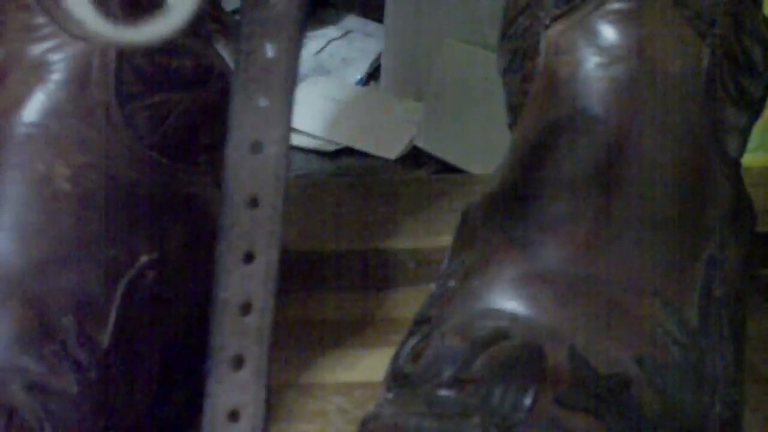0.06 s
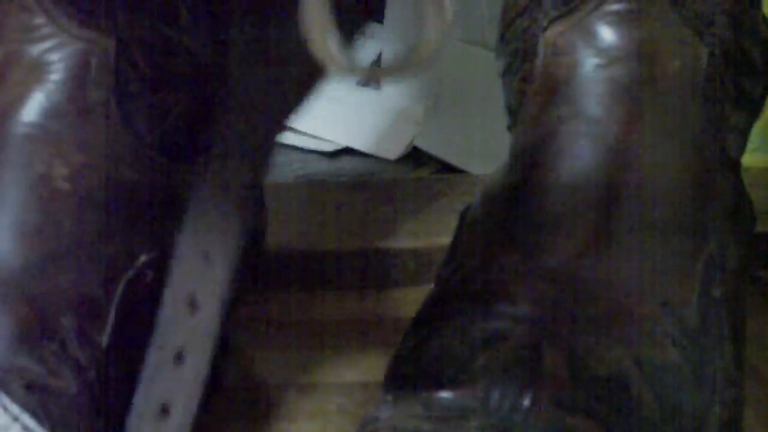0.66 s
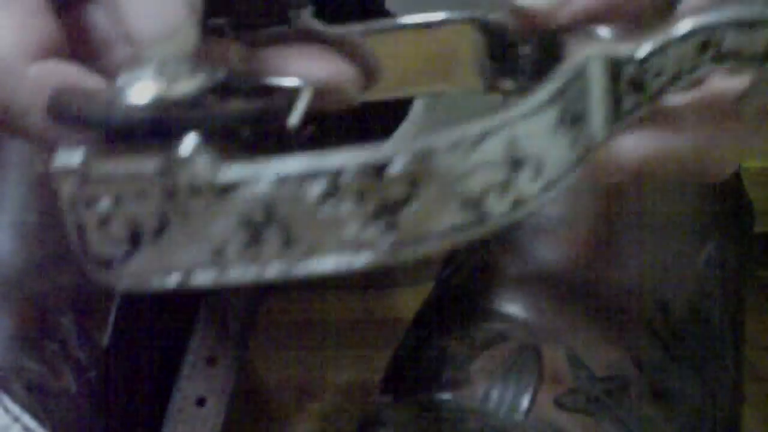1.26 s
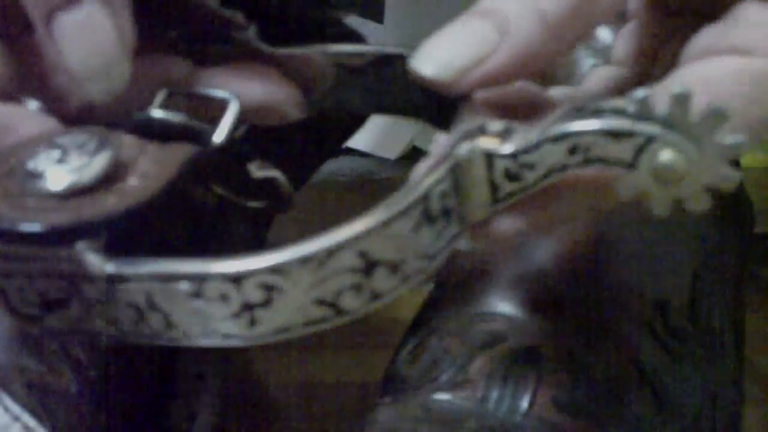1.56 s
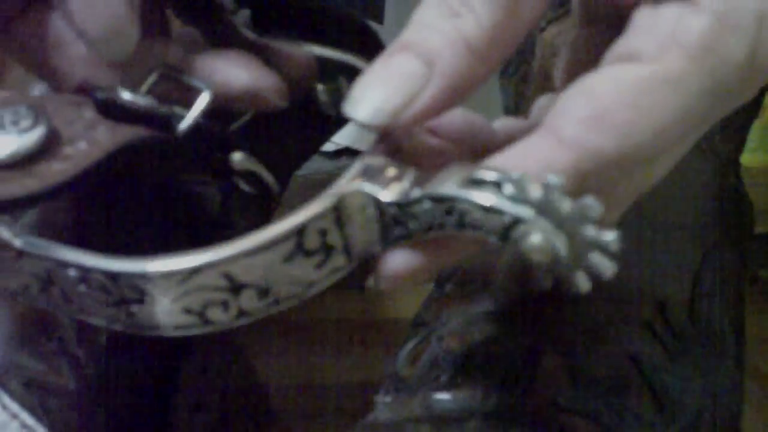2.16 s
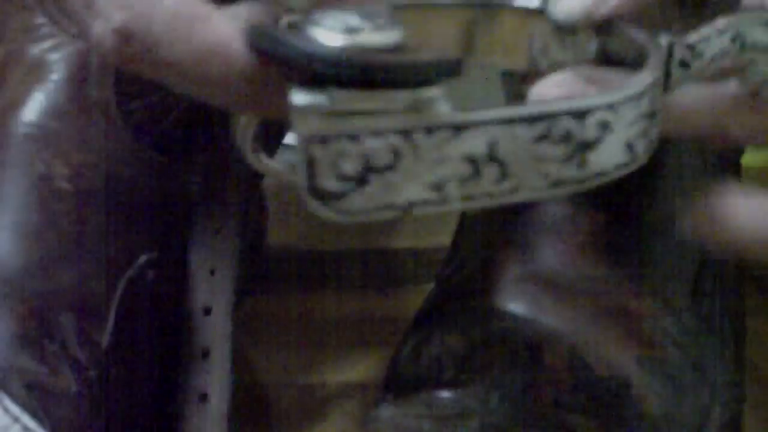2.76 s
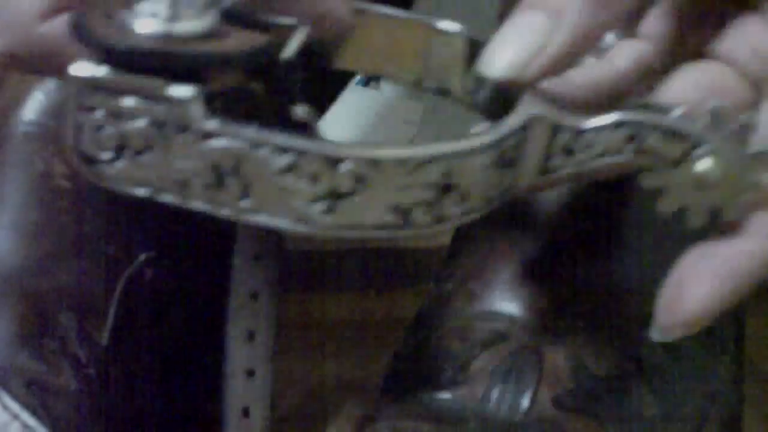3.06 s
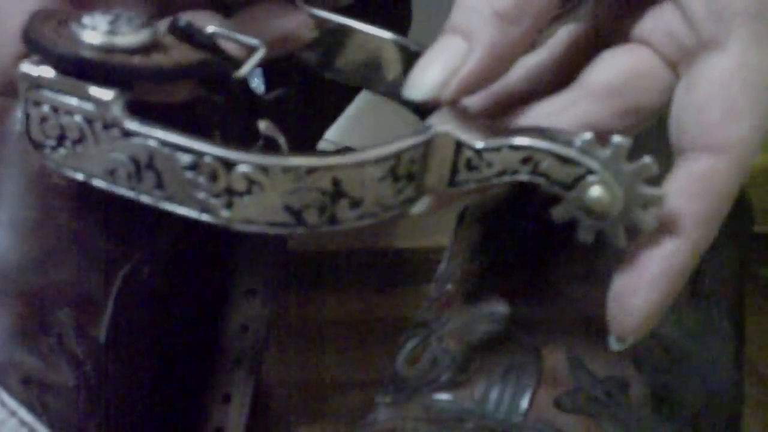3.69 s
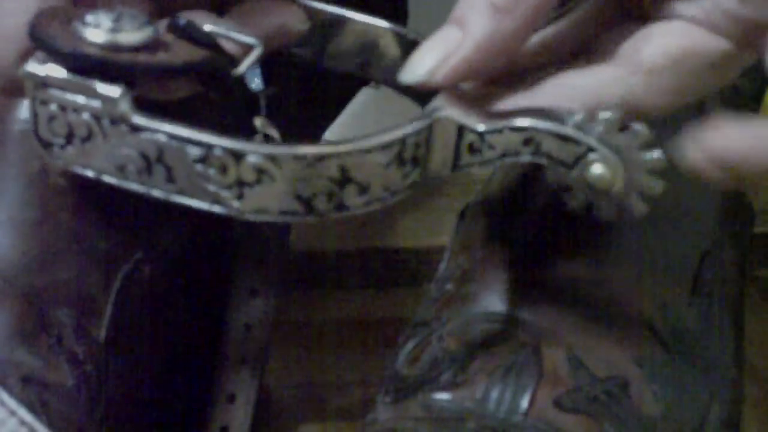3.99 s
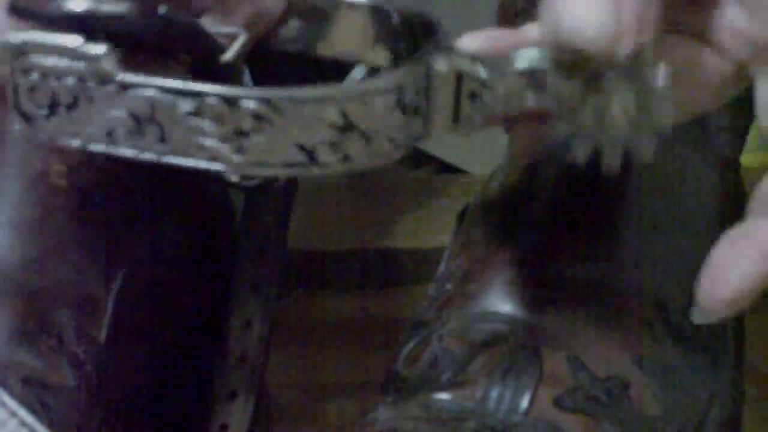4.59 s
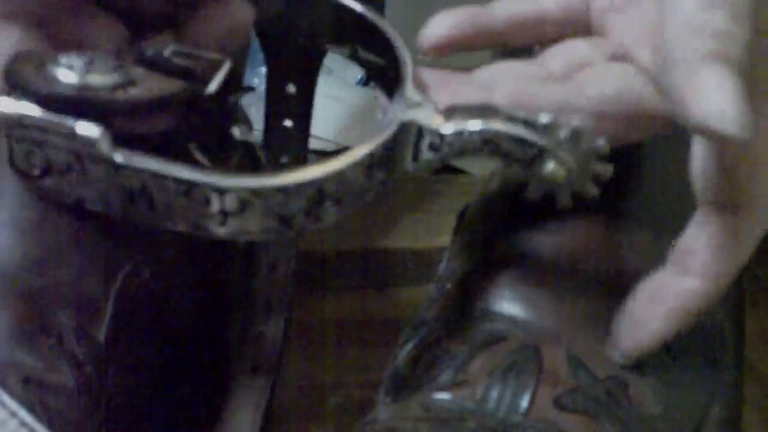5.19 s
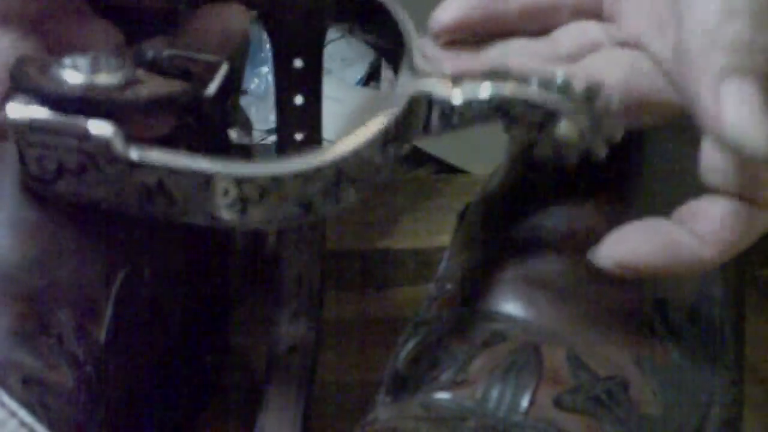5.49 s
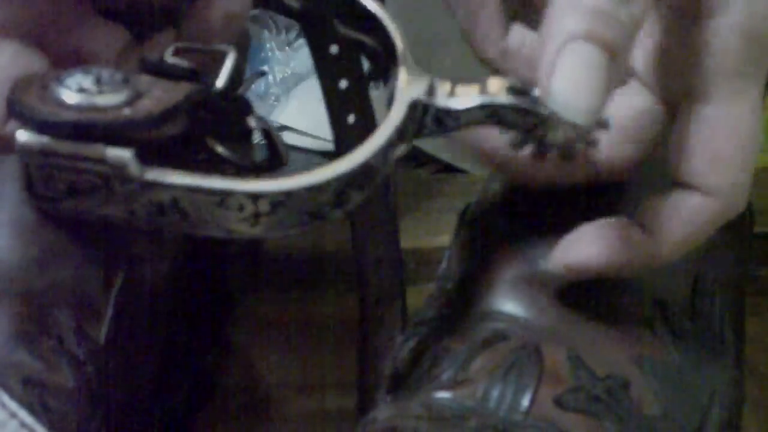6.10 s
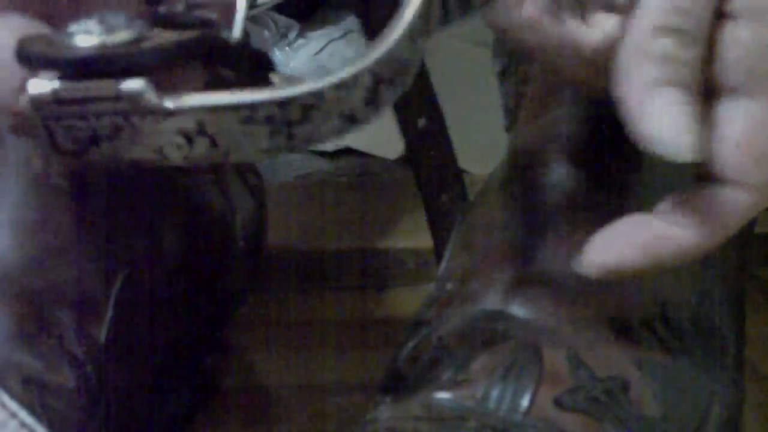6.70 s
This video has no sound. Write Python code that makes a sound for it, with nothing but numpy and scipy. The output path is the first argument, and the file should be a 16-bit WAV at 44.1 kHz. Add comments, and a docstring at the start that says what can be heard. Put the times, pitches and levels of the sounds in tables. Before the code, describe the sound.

Two clattering knocks, then light, high metal clinks and brief rattles from a spur handled close up, with soft pops and rumble underneath.

```python
"""A steel spur turns in the fingers, close to a small microphone in a quiet room.
Its toothed rowel clinks on the pin, scrapes and rattles as it spins, and sets the shank and heel
band ringing; now and then a loose fitting pings. It is picked up at the start with two clattering
knocks on wood. Underneath lie a dull, sputtering rumble with soft pops, one deep thud and faint hiss."""
import sys
import numpy as np
from scipy import signal
from scipy.fft import rfft, irfft, next_fast_len
from scipy.io import wavfile

SR = 44100
rng = np.random.default_rng(int(sys.argv[2]) if len(sys.argv) > 2 else 0)


def master_out(mix):
    """Clip the mix to full scale and print it as 16-bit PCM to the path in sys.argv[1]."""
    frames = np.transpose(np.atleast_2d(mix))
    ceiling = np.clip(frames, -1, 1)
    pcm = np.round(ceiling * 32767).astype(np.int16)
    wavfile.write(sys.argv[1], SR, pcm)


N = 302085

# The room's decay. Each row: frequency in Hz, t60 in seconds.
ROOM_DECAY = [(200, 0.27), (2000, 0.22), (10000, 0.18)]
# The rumble's colour. Each row: frequency in Hz, relative density in dB.
RUMBLE_SPECTRUM = [(15, 1), (30, 0.5), (100, -2), (250, -6), (500, -13.5), (1000, -20.5), (2000, -31.5),
                   (4000, -49), (7000, -57), (11000, -64.5)]
# The rise and fall of the sputtering. Each row: time in seconds, level in dB.
SPUTTER_LEVELS = [(0, -43.5), (.85, -45), (1.15, -40.5), (1.35, -44.5), (1.7, -41), (2.1, -44.5),
                  (3.1, -42.5), (3.8, -45), (6.85, -47)]
# Soft pops that stand out. Each row: time in seconds, level in dB, width in seconds.
LOUD_POPS = [(.202, -26.5, 0.00074), (1.137, -19.5, 0.0024), (1.527, -23.5, 0.0007), (1.654, -28, 0.00065),
             (2.343, -24, .0006), (2.402, -17.5, 0.001), (2.948, -20, 0.0007), (2.959, -19.5, .0009),
             (3.128, -19.5, 0.0011), (3.133, -19, 0.0022), (3.226, -23, 0.0026), (4.543, -27, 0.00054),
             (4.568, -23, .0005), (4.652, -24, 0.00076), (5.987, -21.5, 0.00087)]
# The spur bumps on wood. Each row: start in seconds, level in dB, crack in relative dB, gain of the push.
WOOD_BUMPS = [(.237, -7, -1.5, 0.73), (.246, -21, -1, 0), (0.27, -21.5, -0.5, 0.56), (0.287, -18, 0, 0.16),
              (.291, -16, -2, 0.59), (0.438, -25.5, -14.5, 1), (0.4954, -12.5, -4.5, 0.9),
              (0.5096, -20, 0, 0.99)]
# The wood's modes. Each row: frequency in Hz, relative level in dB, t60 in seconds.
WOOD_MODES = [(89.5, -7.5, 0.19), (122, -1, .15), (160, 3, .15), (205, -4.5, 0.18), (244, 1, 0.3),
              (275, -7, .15), (345, -12.5, .15), (400, -6, 0.21), (421, -6, .2), (689, -8, .2),
              (803, -2.5, 0.088), (892, -3.5, 0.14), (943, -11, 0.16), (1100, -11.5, 0.15),
              (1166, -11, 0.2), (1385, -8.5, 0.163), (1680, -3, 0.081), (1850, -16.5, 0.12),
              (2280, -13, 0.12), (2563, -15.5, .14)]
# The crack of a bump. Each row: frequency in Hz, relative density in dB.
CRACK_SPECTRUM = [(100, -6), (450, 1), (900, 6), (2000, 0.5), (3900, -7), (5200, -13.5), (7000, -14),
                  (11000, -22.5)]
# A loose fitting taps the heel band. Each row: start in seconds, level in dB.
FITTING_PINGS = [(.851, -39), (2.664, -52.5), (3.058, -49), (3.077, -47), (3.378, -53), (4.144, -50.5),
                 (4.802, -40)]
# The fingers' hold on the steel. Each row: time in seconds, factor on the resonance widths.
GRIP_DAMPING = [(0, 1.4), (.6, 2.6), (.9, 1.1), (4.6, 0.98), (4.8, 1.35), (5.2, 1.7), (6.85, 2.2)]
# Dry steel on steel. Each row: frequency in Hz, gain in dB.
RASP_SPECTRUM = [(500, -18), (2300, -7), (3500, -3), (5500, -6), (8000, -1), (11000, 0)]
# Modes of the heel band, shank and rowel. Each row: frequency in Hz, width in Hz, gain in dB.
BAND_MODES = [(1800, 400, -8), (2360, 350, -3.5), (2830, 300, -2.5), (3240, 230, 2.5), (3530, 220, 0),
              (3940, 199.3, -3), (4260, 130, -6), (4785, 200, -9.5), (5350, 360, -17)]
SHANK_MODES = [(5730, 93, -13.5), (6480, 120, -10), (6885, 49, 5.5), (7030, 140, 0.5), (7380, 58, -2)]
ROWEL_MODES = [(8100, 72, -5), (8395, 52, -4), (8800, 83, -10), (9080, 60, -1.5), (9350, 90, -8),
               (9760, 90, -3.5), (10270, 90, -14), (10540, 130, -12)]
# The rowel rubs round its pin. Each row: start and length in seconds, level in dB, favoured pitch in Hz.
ROWEL_SPINS = [(3.962, 0.053, -53, 10400), (4.283, .03, -44.5, 8200), (4.32, 0.15, -61, 9400),
               (4.744, 0.15, -52, 8900), (5.071, 0.11, -54, 8900), (5.397, 0.12, -57.5, 9700),
               (6.401, 0.16, -53, 9100), (6.642, 0.058, -42.5, 8700), (6.75, 0.12, -51, 9100)]
# The spinning rowel wobbles against its pin. Each row: first and last contact in seconds,
# number of contacts, mean level in dB, favoured pitch in Hz.
ROWEL_RATTLES = [(4.079, 4.143, 3, -50, 9450), (4.289, 4.302, 3, -36.5, 8150),
                 (4.333, 4.3755, 3, -47.5, 9400), (4.4244, 4.4446, 2, -44.5, 9400),
                 (4.66, 4.681, 2, -42.5, 8400), (5.0415, 5.1507, 4, -55, 8900),
                 (5.9844, 6.071, 3, -48.5, 9150), (6.414, 6.58, 8, -47, 9050),
                 (6.657, 6.7007, 4, -38.5, 8600)]
# Single contacts of rowel and pin. Each row: start in seconds, level in dB, favoured pitch in Hz.
ROWEL_CLINKS = [(0.2402, -25.5, 9100), (0.2474, -22, 9100), (0.291, -23, 8260), (.376, -51, 8700),
                (0.5185, -36, 8800), (.5267, -38, 9000), (.6288, -44, 8200), (.665, -37.5, 9500),
                (.771, -50.5, 9800), (.8493, -42.5, 9270), (1.0939, -59.5, 9860), (1.3621, -47.5, 9780),
                (1.8887, -57.5, 9600), (2.6638, -51, 10100), (2.7676, -58.5, 8600), (2.8784, -57.5, 8600),
                (3.0565, -44, 9600), (3.078, -50, 9600), (3.3775, -42.5, 9420), (3.7121, -51, 9350),
                (3.909, -48.5, 8230), (3.9554, -36.5, 9900), (3.9732, -42.5, 10500), (4.0083, -50.5, 10100),
                (4.3873, -39.5, 9400), (4.554, -41, 9300), (4.691, -40, 9900), (4.74, -46, 8200),
                (4.802, -44, 8100), (4.8456, -41.5, 9540), (4.87, -35, 9840), (5.2095, -34, 9650),
                (5.231, -45.5, 8860), (5.3996, -51, 8700), (5.4142, -44.5, 8450), (5.4875, -32, 9760),
                (5.5392, -34, 9800), (5.57, -44.5, 9700), (5.7192, -34, 8850), (5.764, -43, 8200),
                (5.8341, -32, 8600), (5.891, -40, 10100), (6.1026, -38.5, 9100), (6.32, -37.5, 9100),
                (6.395, -38, 9100), (6.752, -35, 9020), (6.81, -36, 9800), (6.8169, -28, 9200)]


def amp(db):
    """Decibels to gain."""
    return 10 ** (np.asarray(db) / 20)


def unit_rms(x):
    """x at rms 1."""
    return x / np.sqrt(np.mean(x ** 2) + 1e-20)


def unit_peak(x):
    """x at peak 1."""
    return x / (np.abs(x).max() + 1e-20)


def curve_at(points, hz):
    """Read (Hz, value) points along a log frequency axis."""
    freqs, values = np.transpose(points)
    return np.interp(np.log(hz + 1), np.log(freqs + 1), values)


def filtered(x, response):
    """x through a complex frequency response."""
    size = next_fast_len(len(x) + 4096)
    return irfft(rfft(x, size) * response(np.fft.rfftfreq(size, 1 / SR)), size)[:len(x)]


def noise(spectrum, size):
    """Coloured noise of rms 1."""
    return unit_rms(filtered(rng.standard_normal(size), lambda hz: amp(curve_at(spectrum, hz))))


def fade(t, t60):
    """Exponential decay, 60 dB down after t60."""
    return np.exp(-np.log(1000) * t / t60)


def resonance(f, hz, width):
    """Response at f of one resonance centred on hz."""
    return 1j * f * width / (hz * hz - f * f + 1j * f * width)


def add(track, start_s, x):
    """Mix x into the track."""
    start = max(round(start_s * SR), 0)
    part = track[start:start + len(x)]
    part += x[:len(part)]


def in_room(x, wet_db):
    """The direct sound at the microphone, then a diffuse tail whose treble dies first."""
    hz, t, spectra = signal.stft(rng.standard_normal(SR // 3), SR, nperseg=256)
    decay = fade(t, curve_at(ROOM_DECAY, hz)[:, None])
    build_up = 1 - np.exp(-t / 0.0031)
    tail = signal.istft(spectra * decay * build_up, SR, nperseg=256)[1]
    response = amp(wet_db) * tail / np.linalg.norm(tail)
    response[0] = 1
    return signal.fftconvolve(x, response)


def hiss():
    """A faint, steady noise floor."""
    return amp(-64) * noise([(500, 2.0), (2000, -1.5), (4000, -10.0), (7000, -19), (11000, -24.5)], N)


def pop(width_s):
    """A one-sided rounded pulse with its peak 10 ms in."""
    t = np.arange(SR // 50) / SR - 0.01
    return -np.exp(-2 * np.abs(2 * t / width_s) ** 1.54 / 3)


def sputter(pops_per_s=170, width_s=0.0011, scatter_db=4, pop_db=5, rumble_db=1, low_cut_hz=30):
    """A low rumble full of soft pops; a few stand out."""
    level_db = np.interp(np.arange(N) / SR, *np.transpose(SPUTTER_LEVELS))
    small, large = np.zeros(N), np.zeros(N)
    for when, size, breadth in rng.random((int(pops_per_s * N / SR), 3)):
        gain = amp(scatter_db * min(-np.log(1 - size), 2.8))
        add(small, when * N / SR, gain * pop(width_s * 2.91 ** (2 * breadth - 1)))
    for peak_s, db, width in LOUD_POPS:
        add(large, peak_s - 0.01, amp(db) * pop(width))
    pops = amp(level_db + pop_db) * small + large
    rumble = amp(level_db + rumble_db) * noise(RUMBLE_SPECTRUM, N)
    return rumble + filtered(pops, lambda f: 1j * f / (low_cut_hz + 1j * f))


def thud(start_s=2.229, db=-20, hz=19, t60=0.27):
    """One deep, soft thud."""
    out, t = np.zeros(N), np.arange(SR // 3) / SR
    add(out, start_s, amp(db) * np.sin(2 * np.pi * hz * t) * fade(t, t60))
    return out


def wood_knocks(push_s=0.002, ring_db=-8, crack_t60=0.0419):
    """The bumping spur pushes the wood, makes a short crack and leaves the wood ringing."""
    out, t = np.zeros(N), np.arange(SR // 4) / SR
    hz, mode_db, t60 = np.transpose(WOOD_MODES)[:, :, None]
    push = -unit_peak(np.sin(np.pi * t / push_s) * np.exp(-(t / push_s / 2) ** 2))
    for start_s, db, crack_db, push_gain in WOOD_BUMPS:
        strength = amp(mode_db + rng.normal(0, 2, hz.shape)) * rng.choice([-1, 1], hz.shape)
        ring = unit_peak(np.sum(strength * np.sin(2 * np.pi * hz * t) * fade(t, t60), axis=0))
        crack = unit_peak(noise(CRACK_SPECTRUM, len(t)) * fade(t, crack_t60))
        knock = push_gain * push + amp(ring_db) * ring + amp(crack_db) * crack
        add(out, start_s, amp(db) * in_room(knock, wet_db=-10))
    return out


def fitting_pings(ring_hz=3520, ring_t60=0.035):
    """A loose strap fitting sounds one short note at each tap."""
    out, t = np.zeros(N), np.arange(SR // 10) / SR
    note = np.sin(2 * np.pi * ring_hz * t) * fade(t, ring_t60) * (1 - np.exp(-t / 0.00075))
    for start_s, db in FITTING_PINGS:
        add(out, start_s, amp(db) * in_room(note, wet_db=-14))
    return out


def grip_at(time_s):
    """How strongly the fingers damp the steel at this moment."""
    return np.interp(time_s, *np.transpose(GRIP_DAMPING))


def steel_ring(force, modes, grip, detune=0.0067, scatter_db=3):
    """Steel rings under a force; the grip widens its modes and each contact shifts them a little."""
    hz, width, db = np.transpose(modes)
    shift, strength = rng.standard_normal((2, len(hz)))
    hz = hz * (1 + detune * grip * shift)
    gains = (-1) ** np.arange(len(hz)) * amp(db + scatter_db * strength)
    return filtered(force, lambda f: np.sum(gains * resonance(f[:, None], hz, width * grip), axis=1))


def rasp(force, grip):
    """The unpitched part of a contact; it grows as the grip tightens."""
    return grip * filtered(force, lambda hz: amp(curve_at(RASP_SPECTRUM, hz)))


def struck_rowel(favoured_hz, focus_hz=550, focus_db=8):
    """The rowel's modes; the point of contact weakens those far from favoured_hz."""
    return [(hz, width, db - focus_db * np.tanh(abs(hz - favoured_hz) / focus_hz))
            for hz, width, db in ROWEL_MODES]


def rowel_spins(ticks_per_s=1100, uneven_db=3, shank_db=-10, band_db=-9.5, rasp_db=-24, boost_db=10):
    """The turning rowel scrapes its pin in a stream of tiny uneven ticks."""
    out = np.zeros(N)
    for start_s, length_s, db, favoured_hz in ROWEL_SPINS:
        size, grip = int(abs(length_s) * SR) + 1, grip_at(start_s)
        grains = rng.standard_normal(size) * amp(uneven_db * rng.standard_normal(size))
        grains *= rng.random(size) < ticks_per_s / SR
        ticks = np.pad(unit_rms(grains * signal.windows.tukey(size)), (0, SR // 20))
        parts = [(struck_rowel(favoured_hz), 0), (SHANK_MODES, shank_db), (BAND_MODES, band_db)]
        ring = sum(amp(level) * steel_ring(ticks, modes, grip) for modes, level in parts)
        scratch = amp(rasp_db) * rasp(ticks, grip)
        add(out, start_s, amp(db + boost_db) * in_room(ring + scratch, wet_db=-8))
    return out


def rattle_contacts(gap_growth=1.07, uneven_db=1.5):
    """Contacts of the wobbling rowel, in rows like the clinks; the gaps grow as it slows."""
    contacts = []
    for first_s, last_s, count, db, favoured_hz in ROWEL_RATTLES:
        spacing = gap_growth ** np.arange(round(count))
        times = np.interp(spacing, [spacing[0], spacing[-1]], [first_s, last_s])
        contacts += [(time_s, db + uneven_db * rng.standard_normal(), favoured_hz) for time_s in times]
    return contacts


def rowel_clinks(chatter_t60=0.022, rise_s=0.001, rowel_db=1, rasp_db=-10, medium_db=-44.5):
    """The loose rowel chatters on its pin at each contact and rings the whole spur."""
    out, t = np.zeros(N), np.arange(SR // 10) / SR
    for start_s, db, favoured_hz in ROWEL_CLINKS + rattle_contacts():
        force_db, grip = db - medium_db, grip_at(start_s)
        # Hard contacts stay more in the rowel; a tight grip favours the heel band over the shank.
        shank_db = -3 - 0.12 * force_db - 5 * (grip - 1)
        band_db = -4.5 - 0.3 * force_db + 0.99 * (grip - 1)
        chatter = rng.standard_normal(len(t)) * fade(t, chatter_t60) * (1 - np.exp(-t / rise_s))
        parts = [(struck_rowel(favoured_hz), rowel_db), (SHANK_MODES, shank_db), (BAND_MODES, band_db)]
        ring = sum(amp(level) * unit_peak(steel_ring(chatter, modes, grip)) for modes, level in parts)
        # Contacts that shake the heel band are also the scratchier ones.
        scratch = amp(rasp_db + band_db / 2) * rasp(unit_peak(chatter), grip)
        add(out, start_s, amp(db) * in_room(ring + scratch, wet_db=-7))
    return out


def scene():
    """The spur close up over the noise floor, in mono."""
    spur = wood_knocks() + rowel_clinks() + fitting_pings() + rowel_spins()
    return (spur + thud() + sputter() + hiss())[None]


def record(dry, notch_hz=7850, notch_width_hz=330, top_hz=11030):
    """The small microphone has a narrow dip in the treble and cuts off steeply above top_hz."""
    dip = lambda f: 1 - 0.95 * resonance(f, notch_hz, notch_width_hz)
    high_cut = lambda f: 1 / np.sqrt(1 + (f / top_hz) ** 240)
    return filtered(dry[0], lambda f: dip(f) * high_cut(f))[None]


dry = scene()
out = record(dry)
master_out(out)
```